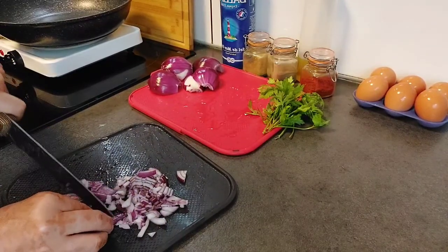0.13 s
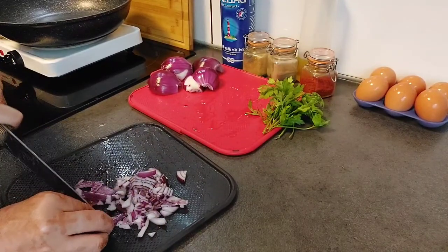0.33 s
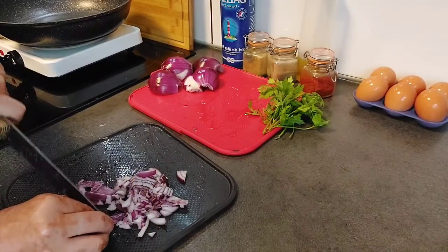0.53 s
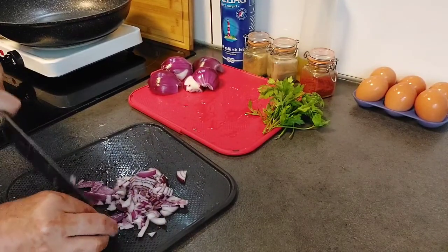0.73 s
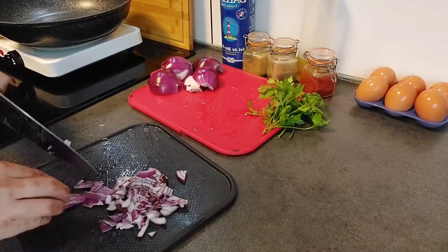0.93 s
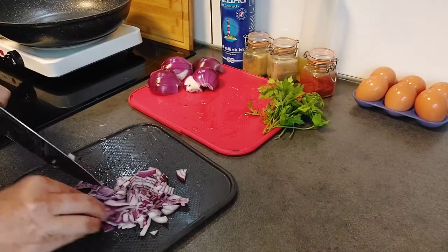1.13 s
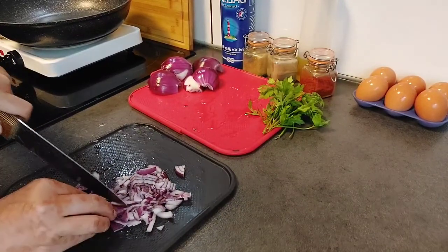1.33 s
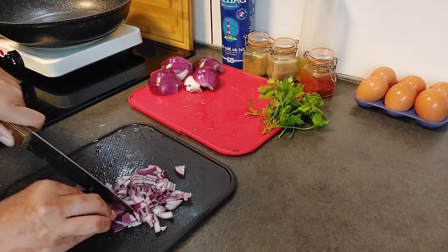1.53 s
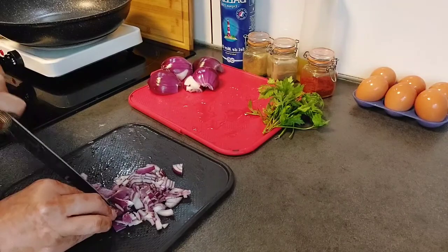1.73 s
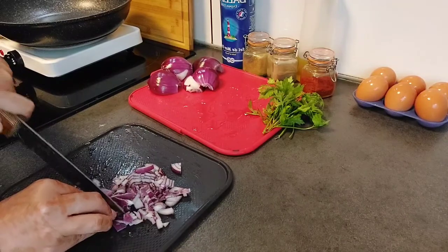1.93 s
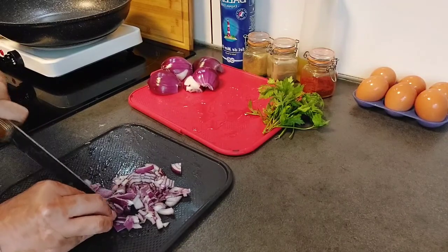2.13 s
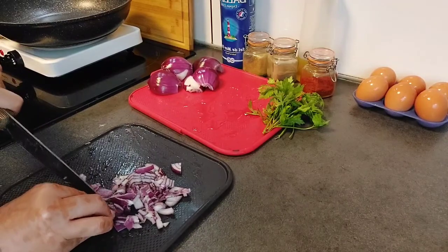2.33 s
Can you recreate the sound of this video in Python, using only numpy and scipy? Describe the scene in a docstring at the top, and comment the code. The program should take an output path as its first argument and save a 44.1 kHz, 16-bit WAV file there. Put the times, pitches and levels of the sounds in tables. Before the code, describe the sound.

Close stereo sound of onion chopping in a small echoing kitchen: a loud knock, a duller one soon after, brief scrape and hiss, a quieter pause, a crunch with almost no knock, and a final double crunch ending in a ringing knock.

```python
"""First a faint low room tone and a small rasp, then a kitchen knife dices an onion on a plastic board.
In each cut there are soft thuds (slow-rising low sines) as the blade lands on the onion or hits the board,
a crunch through the layers (a crackle of random clicks, plus snaps) and a knock (a click and dying sines).
Between cuts the wet blade slides out with a hiss and scrapes the board (shaped noise).
The kitchen is small and live: echoes, a random dying tail and standing waves follow the sounds."""
import sys
import numpy as np
from scipy import signal
from scipy.fft import rfft, irfft
from scipy.io import wavfile
from scipy.ndimage import uniform_filter1d

SR = 44100
rng = np.random.default_rng(int(sys.argv[2]) if len(sys.argv) > 2 else 0)


def wrap_up_sound(samples):
    """Save the sound to the file named by the first command line argument, as 16-bit audio."""
    columns = np.atleast_2d(samples).T
    # keep every value between -1 and 1, then stretch to whole-number steps
    tamed = np.clip(columns, -1, 1)
    steps = np.round(tamed * 32767).astype(np.int16)
    wavfile.write(sys.argv[1], SR, steps)


N = 108045  # length [samples]

# blade meets board: (time [s], level [dB], treble tilt [dB per octave], board note [Hz],
# note level [dB], overtone level [dB], blade ring level [dB])
KNOCKS = [(0.2874, 0, 0, 505, -10, -18, -6), (0.6007, -8, -2.3, 438, -8, -10, -4),
          (2.1077, -7, 0, 530, -4, -5, 9), (1.627, -33, 0, 480, -2, -4, 9)]
# tone of the edge clicking on plastic: (frequency [Hz], level [dB])
CLICK_TONE = [(25, -64.5), (130, -20), (290, -3.5), (500, 5), (1050, -0.5), (1500, -10.5), (1850, -12.5),
              (2100, 1), (3800, -0.5), (4450, -5.5), (5200, 2), (7300, -10), (8300, -7.5), (10000, -10),
              (16000, -28)]
CLICK_DB, CHATTER_DB, CHATTER_S = 11.5, -6, .002  # chatter level is relative to the leading click
NOTE_T60_S, OVERTONE_HZ, OVERTONE_T60_S = 0.015, 683, 0.016  # T60: time to die by 60 dB
BOARD_RISE_S = 0.0012
# ringing of the steel blade: (frequency [Hz], level before each knock's own [dB], T60 [s])
BLADE_MODES = [(2222, -35.5, .07), (2490, -47.5, 0.18), (5070, -47, 0.39)]

# how loud the crunch is through each cut, one list per cut: (time [s], level [dB])
CUTS = [
    [(0.204, -62.5), (0.222, -57), (0.268, -49), (0.286, -30), (0.3, -86)],
    [(0.562, -60), (0.578, -46.5), (0.59, -46), (0.6, -37), (0.612, -77)],
    [(1.36, -67), (1.44, -64.5), (1.48, -57), (1.585, -54), (1.604, -38.5), (1.632, -35.5), (1.655, -52),
     (1.76, -64)],
    [(1.955, -74), (1.99, -58), (2.022, -46), (2.056, -56), (2.072, -47), (2.082, -28), (2.094, -56.5),
     (2.112, -31), (2.135, -70)],
]
# an onion layer snaps: (time [s], level before SNAP_DB [dB])
SNAPS = [(0.2847, -3), (1.287, -34), (1.5949, -14.5), (1.6059, -5), (1.9558, -32), (2.0748, -14),
         (2.0842, -3.5), (2.0986, -3), (2.288, -28), (2.34, -24), (0.2587, -12.5), (1.5363, -9),
         (1.6034, 0.5)]
SNAP_DB, SNAP_S = -3, 0.0018
# tone of onion cells breaking: (frequency [Hz], level [dB])
CRUNCH_TONE = [(30, -44), (300, -7), (700, -3), (1100, -15.5), (1750, -14), (2100, -4), (3500, -5.5),
               (4400, -3.5), (5200, -2.5), (7200, -7), (8300, -1), (10500, -5.5), (12500, -8),
               (16000, -3.5)]
CELLS_PER_S, CELL_SPREAD_DB = 4000, 0.5
CLUMP_S, CLUMP_DB = .006, 3  # smoothing time and spread of the onion's resistance

# wet blade slides along the onion:
# (start [s], length [s], level [dB], treble tilt [dB per octave])
SLIDES = [(-0.04, 0.15, -65.5, -3.5), (0.628, 0.15, -54.5, -3.5), (0.694, 0.066, -48.5, -1.5),
          (1.004, 0.2, -64, -2), (2.256, 0.098, -61, -1.5)]
STROKE_ARCH = 0.45  # power of the half sine that shapes a stroke

# low thuds as the blade lands on the onion or hits the board: (time [s], level [dB], pitch factor)
THUDS = [(0.211, 1.5, 0.97), (0.29, 0.5, 1), (0.5725, -1.5, .93), (1.405, -20.5, 0.75), (1.96, 0, 0.94)]
# ringing of the worktop: (frequency before the pitch factor [Hz], level [dB], T60 [s])
WORKTOP_MODES = [(113.2, -32.5, 0.28), (117, -28, 0.058), (93.7, -44, 0.49)]
THUD_RISE_S, RATTLE_DEPTH = 0.01, 0.19
# speeds of the rattle: (lowest [Hz], highest [Hz])
RATTLE_HZ = (110, 230)
# blade drags on the board: (start [s], length [s], level [dB])
DRAGS = [(0.235, 0.05, -48), (0.62, 0.15, -50), (1.98, 0.11, -52), (1.02, 0.08, -60), (1.6, 0.09, -57)]
# tone of the board trembling under the moving blade: (frequency [Hz], level [dB])
SHUDDER_TONE = [(35, -34.5), (95, 3), (160, -20.5), (300, -15.5), (600, -29), (12000, -75)]

# edge scuffs the board: (time [s], half the swell or fade time constant [s], level [dB], resonance [Hz])
SCUFFS = [(0.031, .007, -52, 570), (0.747, .0025, -39, 2520), (1.759, .006, -56, 650)]
SCUFF_Q, SCUFF_WET = 5, .2  # sharpness of the resonance, share of the room tail

# reflections off worktop and wall, one list for left and one for right: (delay [s], gain)
ECHOES = [
    [(.0022, 0.33), (.0046, 0.23)],
    [(.006, 0.25), (.0098, 0.32)],
]
# late, dull reflections: (delay [s], level [dB])
FAR_WALLS = [(.046, -14), (.081, -18)]
# how fast the room tail dies: (frequency [Hz], T60 [s])
ROOM_T60 = [(100, 0.28), (700, 0.3), (2000, 0.31), (5000, 0.31), (13000, .28)]
# tone of the room tail: (frequency [Hz], level [dB])
TAIL_TONE = [(80, 12), (200, 1.5), (450, 1.5), (2500, 1), (6000, -5.5), (15000, -2.5)]
ROOM_DB, ROOM_ONSET_S = -0.5, 0.00043
# standing waves of the kitchen: (frequency [Hz], level [dB])
ROOM_MODES = [(311, -57), (446, -47.5), (560, -62), (643, -56), (881, -58)]
MODE_T60_S, MODE_BUILD_S = 0.3, 0.036
RIGHT_LAG_S = .00016  # direct sound reaches the right microphone later
TAIL_CYCLES_PER_S = 25  # rounds through the four random tails

# tone of the low room rush: (frequency [Hz], level [dB per Hz])
FLOOR_TONE = [(20, -31), (52, -2.5), (100, 0), (170, -23), (320, -11), (700, -16), (1150, -15), (1800, -30),
              (7000, -36), (15500, -38.5)]
FLOOR_DB = -62.5
# likeness of sound from all sides at the two microphones: (frequency [Hz], correlation)
LIKENESS = [(100, 0.84), (300, .8), (600, -0.39), (1100, -0.23), (3000, -0.021)]

# left microphone over right: (frequency [Hz], difference [dB])
BALANCE = [(110, -2), (300, 3), (1000, -1), (2300, 5), (5000, 3), (12000, -1)]
LOW_CUT_HZ, HIGH_CUT_HZ, CEILING = 42, 15900, .95


def knock(db, tilt, note_hz, note_db, overtone_db, blade_db):
    """The edge clicks and chatters on plastic; the board's note depends on where it is hit; the blade pings."""
    click = amp(CLICK_DB) * colour(burst(CHATTER_S, amp(-CHATTER_DB)), CLICK_TONE, tilt)
    modes = [(note_hz, note_db, NOTE_T60_S), (OVERTONE_HZ, overtone_db, OVERTONE_T60_S)]
    rise = 1 - np.exp(-np.arange(SR // 2) / SR / BOARD_RISE_S)
    board = -ring(modes) * rise
    blade = amp(blade_db) * ring(BLADE_MODES)
    return amp(db) * (click + board + blade)


def crunch():
    """Cells burst in a dense crackle under the blade; whole layers give way with a snap."""
    t, snaps = np.arange(N) / SR, np.zeros(N)
    signs = rng.choice([-1, 1], N)
    sizes = amp(CELL_SPREAD_DB * np.minimum(rng.exponential(1, N), 4))
    bursting = rng.random(N) < CELLS_PER_S / SR
    cells = signs * sizes * bursting
    level = sum(amp(np.interp(t, *np.transpose(cut), left=-200, right=-200)) for cut in CUTS)
    for s, db in SNAPS:
        add(snaps, s, amp(SNAP_DB + db) * burst(SNAP_S))
    # dividing by the coloured loudness makes the cut levels hold after colouring
    crackle = cells * level * clumps() / np.std(colour(cells, CRUNCH_TONE))
    return colour(crackle + snaps, CRUNCH_TONE)


def slides():
    """Wet steel rubs along the onion: hiss with the tone of the crunch, swelling and fading."""
    out = np.zeros(N)
    for s, length, db, tilt in SLIDES:
        add(out, s, stroke(CRUNCH_TONE, length, db, tilt))
    return out


def clumps():
    """Uneven resistance of the onion: a gain that wanders over a few milliseconds."""
    wander = unit(uniform_filter1d(rng.standard_normal(N), round(CLUMP_S * SR)))
    return unit(amp(CLUMP_DB * wander))


def thuds():
    """Pushes and hits rock the board, which rattles on the worktop and shudders as the blade drags."""
    out, t = np.zeros(N), np.arange(SR // 2) / SR
    rise = 1 - np.exp(-t / THUD_RISE_S)
    for s, db, pitch in THUDS:
        add(out, s, -amp(db) * rise * ring(WORKTOP_MODES, pitch))
    band = signal.butter(2, RATTLE_HZ, "bandpass", fs=SR, output="sos")
    rattle = signal.sosfilt(band, rng.standard_normal(N))
    out *= 1 + RATTLE_DEPTH * unit(rattle)
    for s, length, db in DRAGS:
        add(out, s, stroke(SHUDDER_TONE, length, db))
    return out


def scuffs():
    """Short rasps of the edge on the board: noise through one resonance."""
    out, t = np.zeros(N), np.arange(N) / SR
    for s, half, db, hz in SCUFFS:
        resonance = signal.iirpeak(hz, SCUFF_Q, SR)
        rasp = unit(signal.lfilter(*resonance, rng.standard_normal(N)))
        out += amp(db) * rasp * np.exp(-abs(t - s) / half / 2)
    return out


def stroke(points, length, db, tilt=0):
    """Friction noise that swells and fades with one movement of the blade."""
    noise = unit(colour(rng.standard_normal(SR // 2), points, tilt))[:int(length * SR)]
    arch = np.sin(np.pi * np.arange(len(noise)) / len(noise)) ** STROKE_ARCH
    return amp(db) * noise * arch


def kitchen(sound, wet=1):
    """A sound at both microphones: direct, near echoes, far walls, random dying tail, standing waves."""
    t, heard = np.arange(SR // 2) / SR, []
    hz, when, z = signal.stft(diffuse(len(t)), SR, nperseg=256)
    dying = amp(-60 * when / read(ROOM_T60, hz)[:, None])
    tails = signal.istft(z * dying, SR, nperseg=256)[1][:, :len(t)]
    tails = tails * (1 - np.exp(-(t / ROOM_ONSET_S) ** 2))
    dull = np.hanning(32) / np.hanning(32).sum()  # a smooth bump, so little treble
    build = 1 - np.exp(-t / MODE_BUILD_S)
    standing = ring([(f, db, MODE_T60_S) for f, db in ROOM_MODES]) * build
    for channel, tail in enumerate(tails):
        tail = colour(tail / np.linalg.norm(tail), TAIL_TONE)
        response = wet * amp(ROOM_DB) * tail + standing
        response[round(channel * RIGHT_LAG_S * SR)] += 1  # direct sound
        for delay, gain in ECHOES[channel]:
            response[round(delay * SR)] += gain
        for delay, db in FAR_WALLS:
            add(response, delay, amp(db) * dull)
        heard.append(signal.fftconvolve(sound, response)[:N])
    return np.array(heard)


def room_tone():
    """Steady low rush of the kitchen: noise from all sides, shaped by frequency."""
    gain = amp(read(FLOOR_TONE, np.fft.rfftfreq(N, 1 / SR)))
    return amp(FLOOR_DB) * unit(irfft(rfft(diffuse(N)) * gain, N))


def diffuse(size):
    """White noise as two nearby microphones hear it from all sides: partly alike, by frequency."""
    a, b = rfft(rng.standard_normal((2, size)))
    same = np.clip(read(LIKENESS, np.fft.rfftfreq(size, 1 / SR)), -1, 1)
    return irfft(np.array([a, same * a + np.sqrt(1 - same ** 2) * b]), size)


def burst(decay_s, lead=0):
    """A leading click and a quickly dying cluster of tiny contacts, with a nearly even spectrum and energy 1."""
    t = np.arange(SR // 2) / SR
    x = rng.standard_normal(len(t)) * np.exp(-t / decay_s)
    x[0] += lead * np.linalg.norm(x)
    fade = np.exp(-(t / decay_s / np.pi / 2) ** 2)
    for _ in range(10):  # level the spectrum, then shorten again
        even = irfft(np.exp(1j * np.angle(rfft(x))), len(t))
        x = even * fade
    return x / np.linalg.norm(x)


def ring(modes, pitch=1):
    """Dying sines of a struck object."""
    t = np.arange(SR // 2) / SR
    return sum(amp(db - 60 * t / t60) * np.sin(2 * np.pi * hz * pitch * t) for hz, db, t60 in modes)


def colour(x, points, tilt=0, size=4096):
    """Filter with the given spectrum, tilted above 1 kHz, that never sounds ahead of its input."""
    hz = abs(np.fft.fftfreq(size, 1 / SR))
    octaves = np.log2(np.maximum(hz / 1000, 1))
    log_gain = np.log(amp(read(points, hz) + tilt * octaves))
    # minimum phase: as early as this spectrum allows
    taps = np.fft.ifft(np.exp(np.conj(signal.hilbert(log_gain)))).real
    return signal.fftconvolve(x, taps[:size // 2])[:len(x)]


def amp(db):
    """Decibels to gain."""
    return 10 ** (np.asarray(db) / 20)


def unit(x):
    """Scales to rms (average strength) 1."""
    return x / np.sqrt(np.mean(x ** 2) + 1e-20)


def read(points, hz):
    """Reads a table on a log-frequency axis."""
    f, value = np.transpose(points)
    return np.interp(np.log(hz + 1), np.log(f + 1), value)


def add(mix, s, sound):
    """Mixes a sound in at time s, trimming what falls outside."""
    at = round(s * SR)
    sound = sound[max(-at, 0):]
    part = mix[max(at, 0):][:len(sound)]
    part += sound[:len(part)]


def scene():
    """Knocks and onion sound into the kitchen; the thuds reach both microphones alike."""
    onion = crunch() + slides() * clumps()
    out = thuds() + room_tone() + kitchen(scuffs(), SCUFF_WET)
    turn = np.arange(N) / SR * TAIL_CYCLES_PER_S
    # the onion sound crossfades steadily through four random room tails,
    # so successive snaps ring differently
    for tail in range(4):
        away = np.minimum(abs((4 * turn + tail) % 4 - 2), 1)
        out += kitchen(onion * np.cos(np.pi / 2 * away))
    for s, *blow in KNOCKS:
        for side, sound in zip(out, kitchen(knock(*blow))):
            add(side, s, sound)
    return out


def record(dry):
    """Two microphones of unlike colour lose the deepest bass; loud peaks saturate softly; top treble is cut."""
    low_cut = signal.butter(2, LOW_CUT_HZ, "highpass", fs=SR, output="sos")
    dry = signal.sosfilt(low_cut, dry)
    balance = read(BALANCE, np.fft.rfftfreq(N, 1 / SR))
    balanced = irfft(rfft(dry) * amp([balance / 2, -balance / 2]), N)
    wave = CEILING * np.tanh(balanced / CEILING)
    high_cut = signal.firwin(511, HIGH_CUT_HZ, window=("kaiser", 9), fs=SR)
    return signal.oaconvolve(wave, high_cut[None], "same")


dry = scene()
out = record(dry)
wrap_up_sound(out)
```